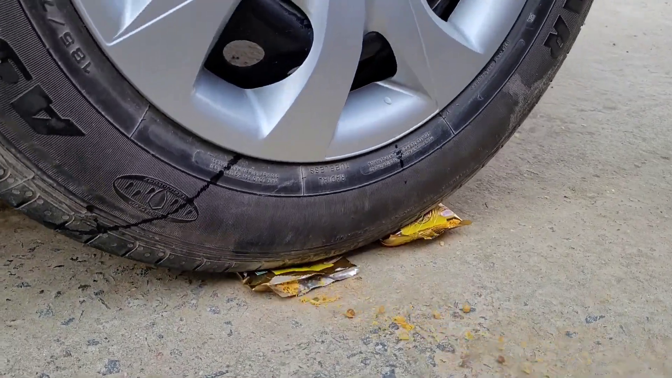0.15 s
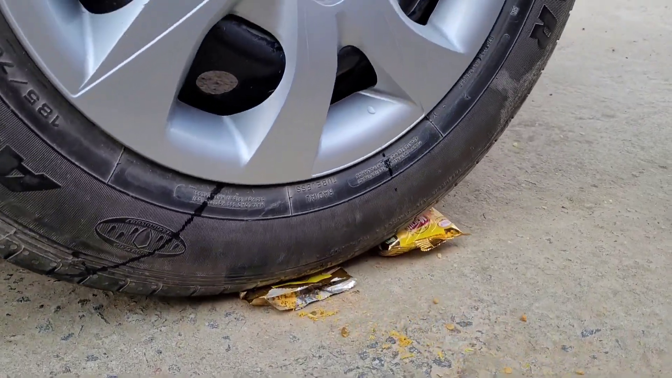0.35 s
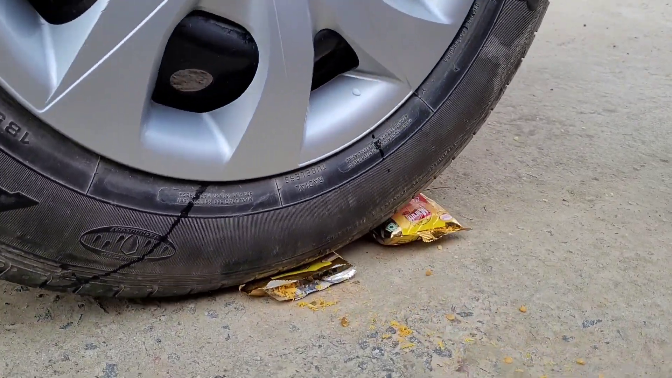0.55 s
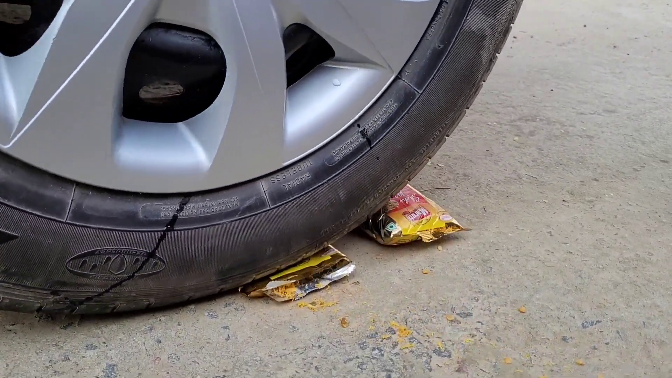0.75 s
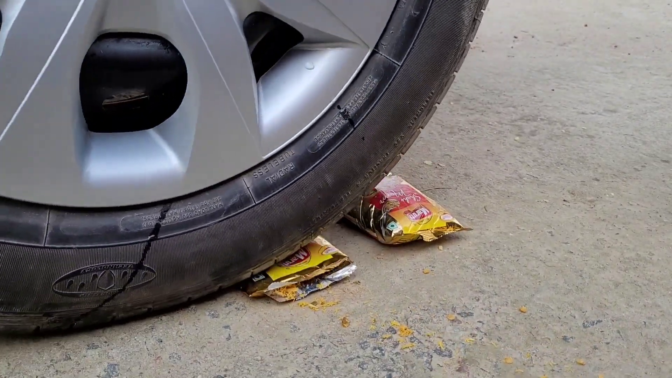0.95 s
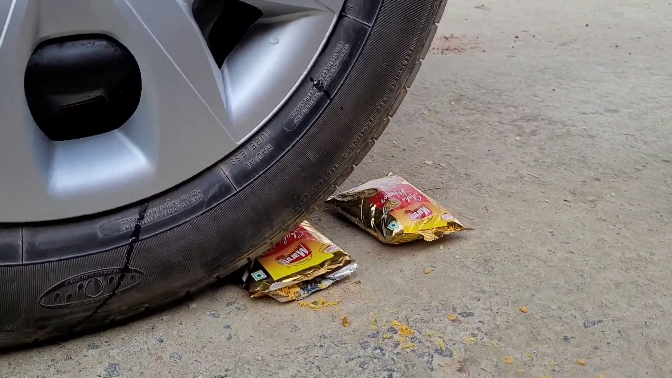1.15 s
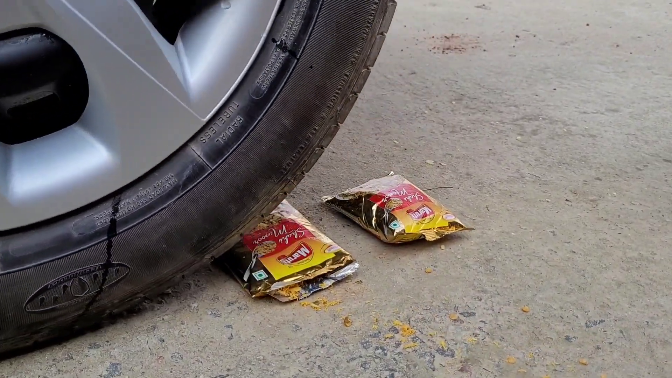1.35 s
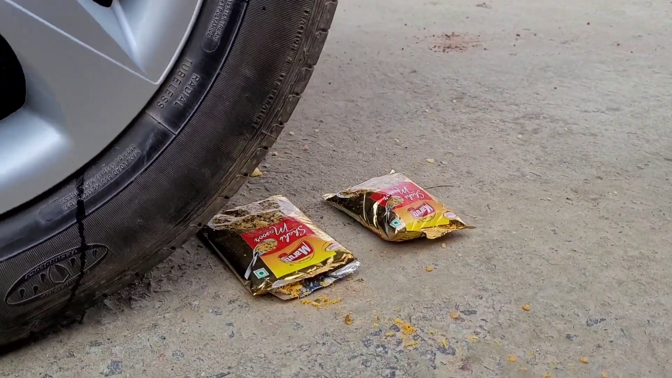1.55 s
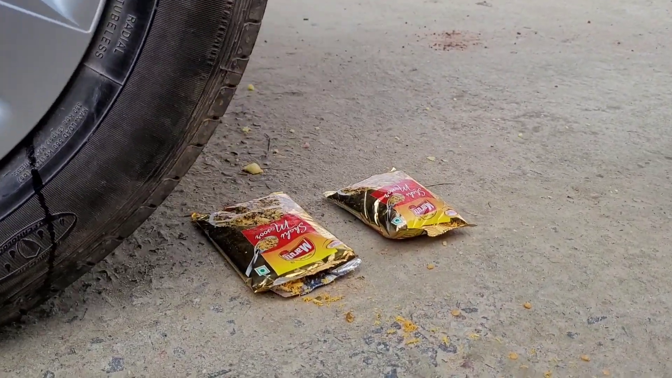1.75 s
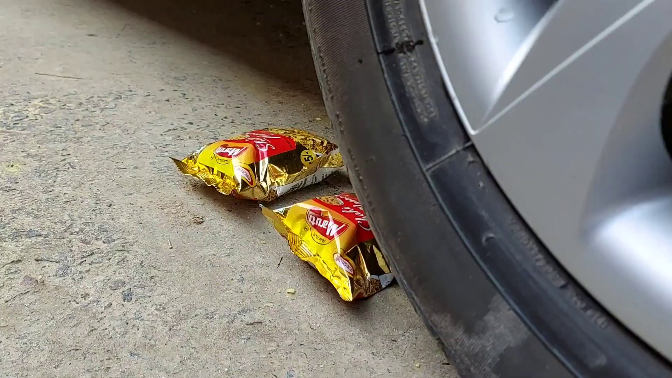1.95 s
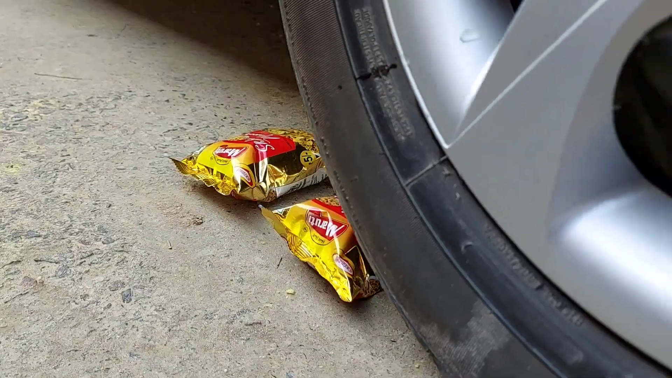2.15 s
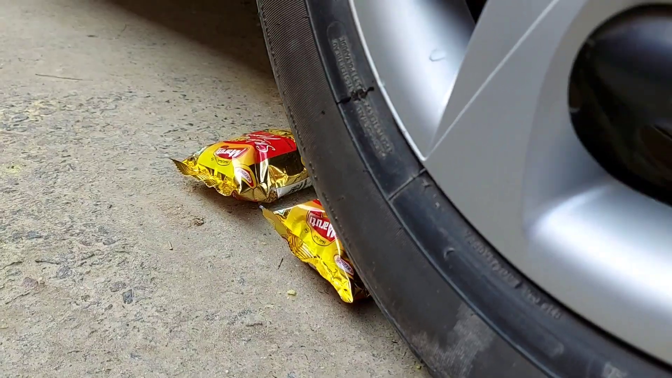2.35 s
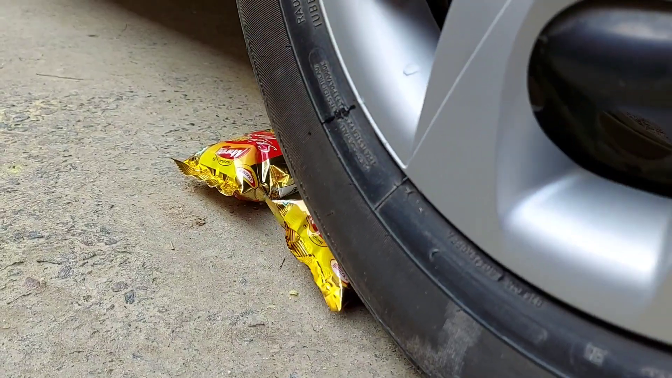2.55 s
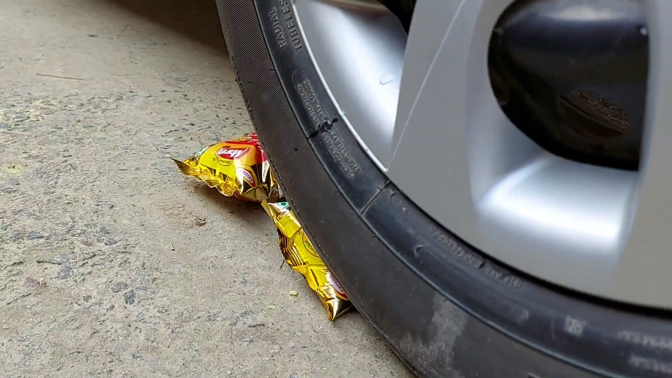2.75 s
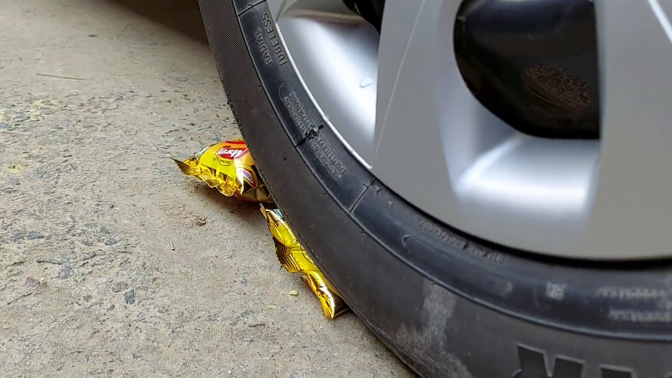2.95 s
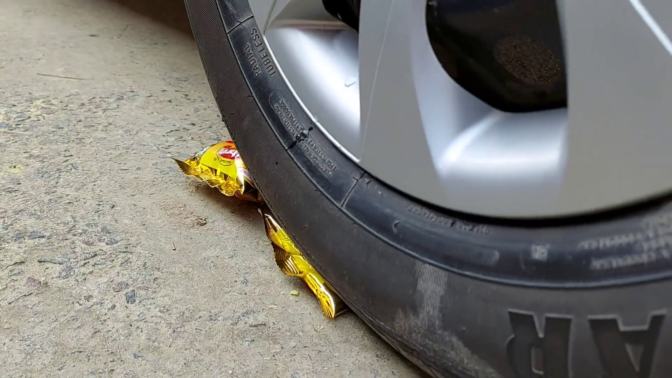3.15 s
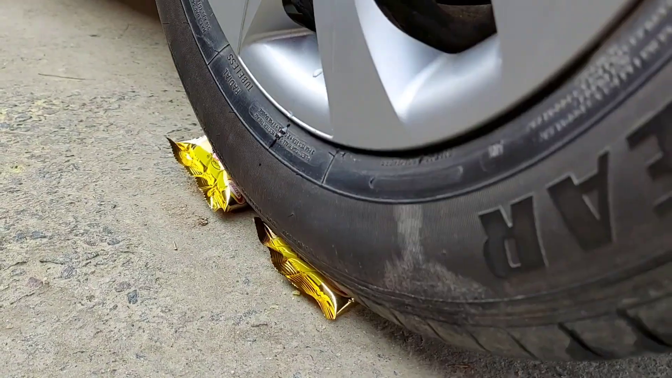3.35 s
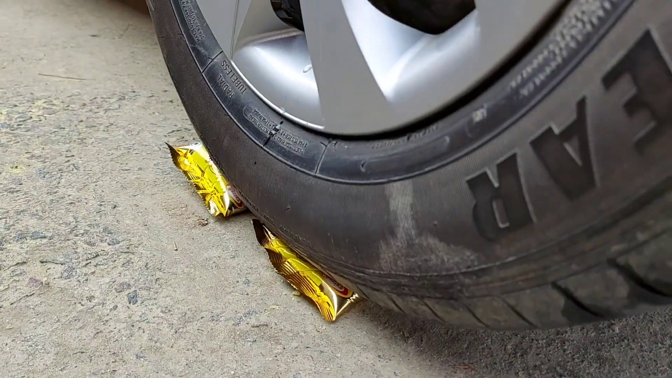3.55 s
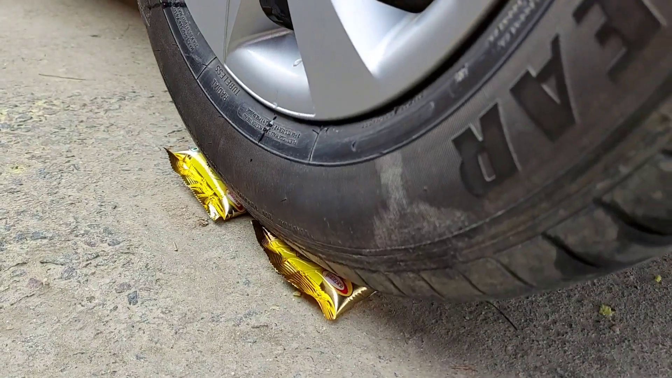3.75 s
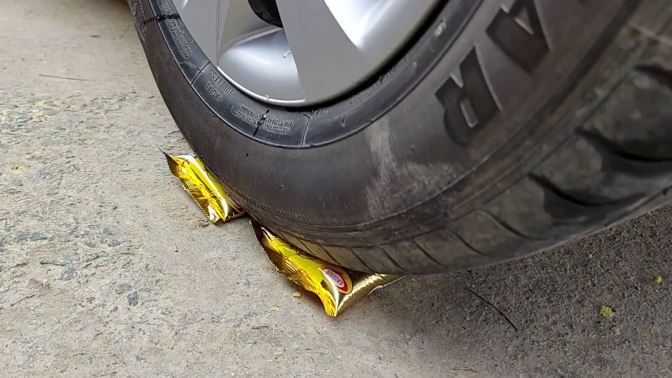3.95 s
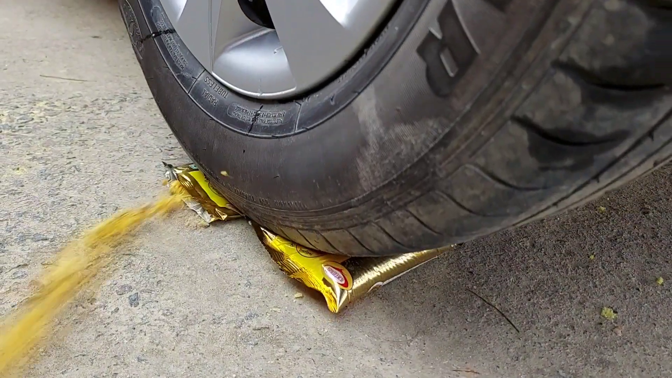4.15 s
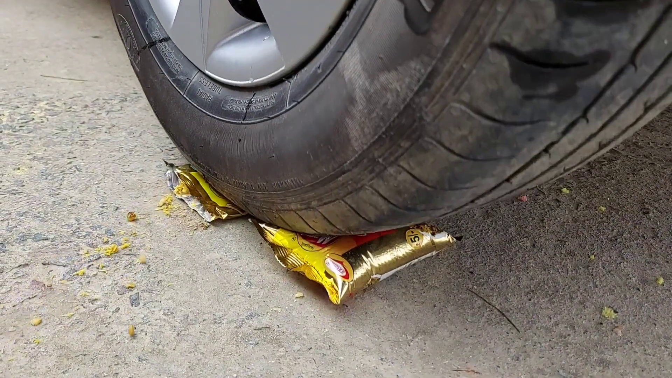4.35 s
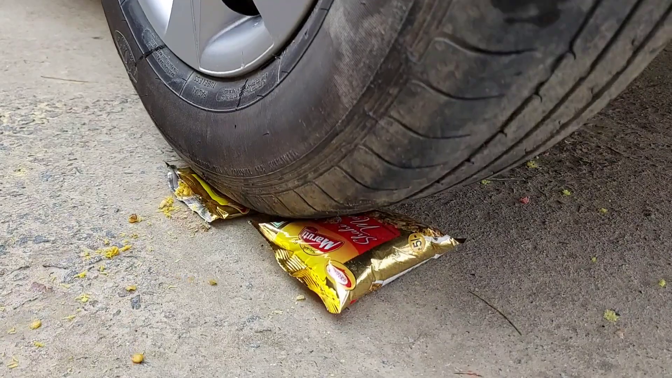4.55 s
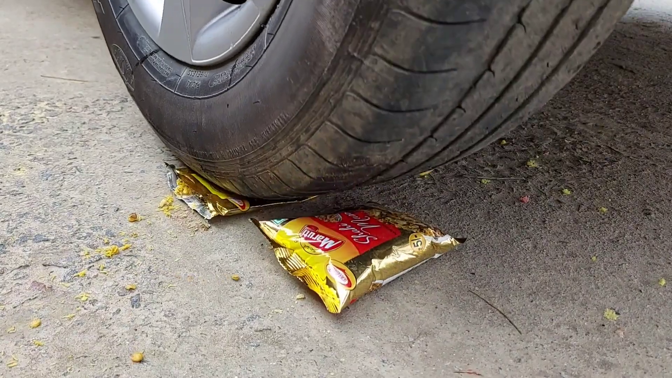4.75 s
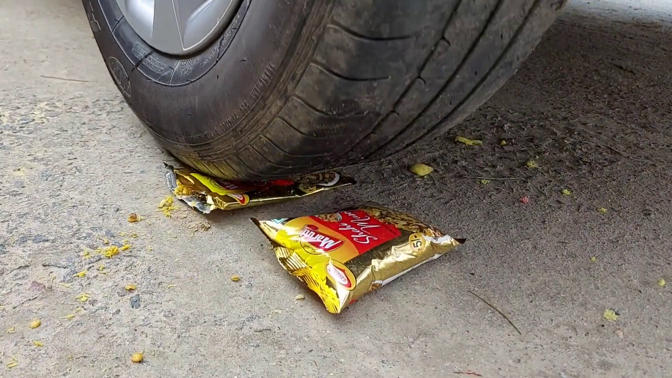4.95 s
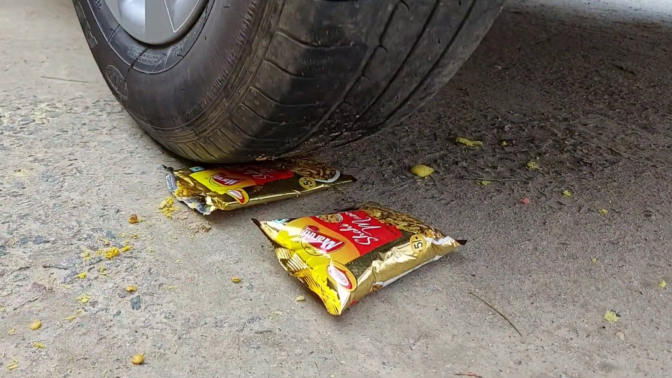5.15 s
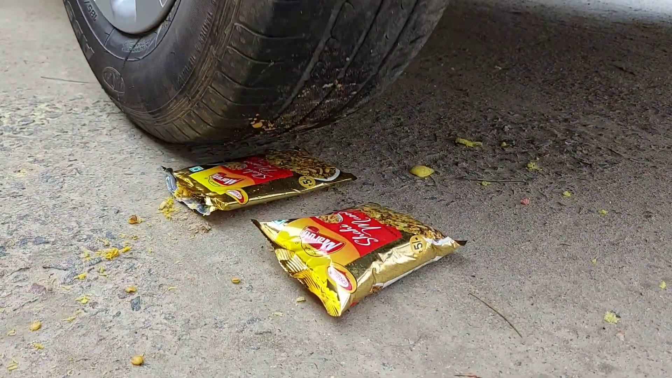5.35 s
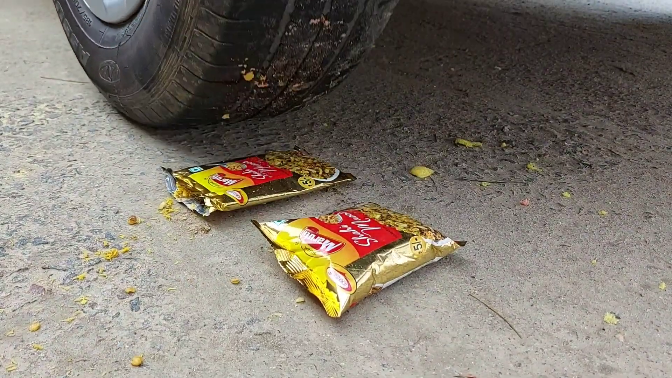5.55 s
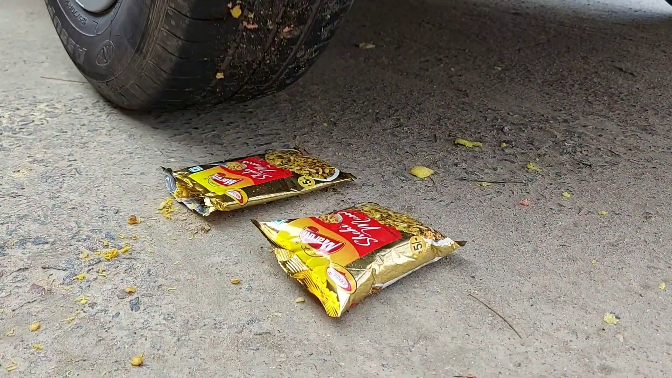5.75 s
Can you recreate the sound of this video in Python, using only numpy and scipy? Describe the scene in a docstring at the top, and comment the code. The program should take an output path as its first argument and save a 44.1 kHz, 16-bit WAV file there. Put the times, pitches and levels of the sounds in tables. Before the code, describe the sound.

Two explosive packet pops under a slow car wheel, with a dense crunch of foil and snacks between them over a low engine rumble.

```python
"""Two bangs, snapping foil and crunching snacks, over the idling engine of a car in a concrete yard.
The car creeps over sealed foil packets twice, with a short lull between the passes; one bursts in each.
A burst is a shock pulse, a rush of shaped noise, sine rings for the tyre and a diffuse wall echo.
Snaps are short damped sines with noise, crushing is showers of noise grains, the engine is sines and noise.
A microphone with two ports hears it all, each port in its own colour and with its own delay."""
import sys
import numpy as np
from scipy import signal
from scipy.fft import rfft, irfft
from scipy.io import wavfile
from scipy.ndimage import uniform_filter1d

SR = 44100
rng = np.random.default_rng(int(sys.argv[2]) if len(sys.argv) > 2 else 0)


def bounce(signal):
    """Save signal as a 16-bit WAV file at the path given by the first command-line argument."""
    frames = np.transpose(np.atleast_2d(signal))
    limited = np.clip(frames, -1, 1)
    pcm = np.round(limited * 32767).astype(np.int16)
    wavfile.write(sys.argv[1], SR, pcm)


N = 255471
TIME = np.arange(N) / SR  # [s]

# All levels are relative; spectra set a colour only and are scaled to keep the level of white noise.

# packets bursting: (time [s], bang level [dB], air rush level [dB], rush hold [s], rush decay [s],
# air push on the microphone level [dB], tyre ring level [dB])
BURSTS = [(0.0914, -13.5, -14, 0.025, 0.0067, -12.5, -44), (4.2155, 0, -23, 0.033, 0.018, -34, -41.5)]
# the air rush through each torn seam, one spectrum a burst: (frequency [Hz], level per Hz [dB])
RUSH_SPECTRA = [
    [(110, -32), (180, -9), (260, 4.5), (450, -6.5), (1000, -7), (1800, -9), (3200, -10), (5200, -15),
     (7200, -12), (8500, -29.5), (14500, -25), (16500, -29.5)],
    [(110, -3.5), (180, -10), (340, 8), (520, -1), (1350, 7), (1800, 4), (2400, 2.5), (5200, -3.5),
     (7000, -23.5), (10500, -17), (14500, -17), (16500, -29.5)],
]
# what a burst sets ringing in the tyre: (frequency [Hz], level [dB], time to fall 60 dB [s])
TYRE_RINGS = [(88, 13, 0.51), (241.7, 5, 1.27), (257.8, 16, 0.33), (321, 9, 0.058), (460, -14.5, 2)]
# dull thumps of the tread and of collapsing snacks: (time [s], level [dB], pitch [Hz])
THUMPS = [(0.81, -50.5, 189), (1.091, -47, 110), (2.167, -25.5, 172), (2.581, -26, 372),
          (2.605, -23.5, 330), (2.636, -25.5, 632), (2.652, -25, 479), (2.66, -44, 360), (5.217, -40, 92.7)]
# the clearest snaps of foil and snack: (time [s], level [dB], pitch [Hz], foil tick level [dB])
SNAPS = [(0.657, -37.5, 3430, -59.5), (0.988, -40, 3850, -77), (1.074, -37.5, 3560, -64),
         (1.276, -41.5, 3850, -69), (1.798, -20.5, 3870, -56.5), (2.524, -14.5, 1100, -43.5),
         (2.536, -13, 1104, -40), (2.581, -18.5, 1316, -53), (2.597, -6, 1360, -33.5),
         (2.606, -7.5, 2360, -33), (2.62, -3.5, 1250, -40), (2.646, -3.5, 2310, -31.5),
         (2.66, 2, 2345, -29.5), (2.691, -17, 2074, -45), (2.705, -3.5, 2314, -44.5),
         (2.724, -1, 2760, -32.5), (2.769, -8.5, 2140, -38), (2.798, -2.5, 2800, -40),
         (2.819, -15, 2370, -26.5), (2.835, -5, 4870, -33.5), (2.898, -6, 3000, -21),
         (2.956, 1, 1980, -32.5), (2.988, -14.5, 1970, -62.5), (3.044, -11.5, 4950, -36.5),
         (3.411, -19.5, 1370, -59), (3.443, -17.5, 1960, -60), (3.464, -21, 1040, -42.5),
         (3.495, -9.5, 2080, -29.5), (3.602, -25.5, 2400, -46.5), (3.706, -11.5, 4970, -23.5),
         (3.769, -18.5, 5470, -28.5), (3.836, -20.5, 4200, -35.5), (3.949, -22.5, 3300, -35),
         (3.98, -25.5, 2710, -36), (4.027, -15.5, 4830, -38), (4.059, -22, 1090, -49),
         (4.101, -25, 1200, -38), (4.14, -25, 1310, -52), (4.17, -22, 1110, -51), (4.478, -35, 1980, -54.5),
         (5.113, -37.5, 2410, -61.5), (5.197, -39, 1526, -62)]
# flurries of lesser snaps:
# (start [s], end [s], typical level [dB], typical pitch [Hz], typical foil tick level [dB])
FLURRIES = [(0.219, 0.56, -44, 3000, -61), (2.571, 2.68, -12.5, 900, -44), (3.369, 3.57, -22, 1510, -52),
            (3.651, 3.83, -22.5, 3780, -42), (4.565, 4.8, -40.5, 2000, -68.5),
            (5.218, 5.48, -49.5, 2380, -67.5)]
# packets giving way under the tread: (time [s], level [dB], time stretch of the crushing stages [ratio])
PACKETS = [(2.64, 2.5, 0.97), (3.439, -12.5, 1.4)]
# stages of crushing, in the order crumble, crunch, foil crinkle, before the stretch and level of a packet:
# (delay [s], peak level [dB], rise [dB/s], fall [dB/s], steady level under the tyre's weight [dB])
CRUSH_STAGES = [(0, -34, 95, 151, -58.5), (.075, -30.5, 132.5, 111, -51.5), (0.131, -37.5, 170.5, 81, -65)]
# the tyre's contact with the packets: (first [s], last [s])
CONTACT_S = (2.45, 4.22)
# colour of crumbling snack: (frequency [Hz], level per Hz [dB])
CRUMBLE_SPECTRUM = [(150, -10.5), (330, -1.5), (450, 3.5), (700, -9), (1100, -32.5), (2500, -56)]
# colour of crunching snack: (frequency [Hz], level per Hz [dB])
CRUNCH_SPECTRUM = [(450, -21), (850, -3), (1300, 2), (1800, -0.5), (2350, 0), (3200, -3), (4200, -3.5),
                   (5200, -2), (6200, -23.5), (9000, -40)]
# colour of foil: (frequency [Hz], level per Hz [dB])
FOIL_SPECTRUM = [(3000, -21), (5000, 3), (7300, -8.5), (8600, -6.5), (10500, 3), (12500, -4),
                 (15000, -12.5), (16500, -13.5)]
# colour of the crumpling around a snap: (frequency [Hz], level per Hz [dB])
CRUMPLE_SPECTRUM = [(200, -19), (600, -19.5), (1200, 2.5), (2400, 5.5), (3300, 1.5), (5200, 0.5),
                    (6500, -16.5), (12000, -23)]
# foil rubbing under the rubber: (start [s], end [s], level [dB], pitch [Hz])
RUBS = [(0.0, 0.085, -45, 1360), (2.438, 2.513, -44.5, 2660), (3.064, 3.46, -48, 1395)]
# flattened packets relaxing behind the tyre: (start [s], end [s], level [dB])
SETTLING = [(0.3, 1.353, -76.5), (4.408, 5.485, -66.5)]
# the car rolls away, returns, rolls away again and grows louder at the end:
# (time [s], engine level [dB], hiss level [dB])
CAR_LEVELS = [(0, -39, -48), (0.22, -60, -63), (0.7, -69.5, -75), (1.27, -66.5, -77), (1.62, -50, -63.5),
              (1.9, -47.5, -59.5), (2.14, -38, -54), (2.8, -40, -55), (3.15, -45.5, -54.5),
              (4.16, -41, -58), (4.5, -53.5, -60), (4.75, -61, -71.5), (5.5, -57, -73.5),
              (5.79, -48, -65.5)]
# engine orders: (multiple of the firing rate [ratio], level [dB])
ENGINE_ORDERS = [(2, -1.5), (3, -14.5), (4, -9.5)]
# engine rumble: (frequency [Hz], level per Hz [dB])
RUMBLE_SPECTRUM = [(15, -28.5), (28, -7), (50, -8), (90, 0.5), (125, -7.5), (180, -6), (260, -19),
                   (390, -15.5), (560, -25), (1000, -31), (2000, -54)]
# rolling hiss, one spectrum a pass: (frequency [Hz], level per Hz [dB])
HISS_SPECTRA = [
    [(300, -11), (550, 1), (1000, 1), (1350, -6.5), (2400, -1), (4200, 0), (5400, -5), (7200, 3),
     (8500, -14.5), (14500, -13.5), (16500, -21)],
    [(300, -11.5), (700, -2.5), (1000, 0.5), (1350, -7.5), (2300, -0.5), (3300, -7), (5200, -9),
     (6300, -20), (8000, -25), (10500, -18.5), (13000, -25.5), (15500, -37.5)],
]
# decay of the yard's open-air tail: (frequency [Hz], time to fall 60 dB [s])
YARD_DECAY = [(100, 0.17), (500, 0.67), (2500, 0.41), (6000, 0.25), (12000, 0.84)]
# wall echo after each burst: (first burst level [dB], second burst level [dB])
WALL_ECHO_DB = (-23, -16.5)
# balance of the two microphone ports, one curve a pass: (frequency [Hz], left minus right [dB])
PORT_BALANCE = [
    [(300, 2), (900, -2), (2000, -2.5), (5000, -2.5), (6300, -9.5), (8300, -11), (10500, 2.5), (14500, 0)],
    [(250, 3), (450, 7), (780, 20), (1050, 14), (1350, 4.5), (1800, 14.5), (2400, 18.5), (3200, -1),
     (4200, 0), (5200, -5), (6500, 4.5), (8500, 0.5), (10500, 10.5), (14500, 11.5)],
]

FIRING_HZ = 31.65  # mean firing rate of the engine
LULL_S, LULL_DB, LULL_WIDTH_S = 2.0, -21, 0.11  # centre, depth and half width of the dip between passes
FLURRY_GAP_S = 0.045  # mean time between the snaps of a flurry
STRAIN_LEAD_S = 0.007  # how long a buckle strains before it snaps
CRUMPLE_DB = -11  # crumpling around a snap, relative to that snap
EDGE_HZ = 15900  # upper band limit of the microphone


def bursts(shock_s=0.00058, tear_db=-5, tear_s=0.0051, rush_rise_s=0.00022, push_hz=58,
           dulling_hz=4000, dulling_s=0.063):
    """A shock as the seam tears, then escaping air that dulls as the pressure falls."""
    out = np.zeros((2, N))
    t = np.arange(SR // 3) / SR
    lowpass = signal.butter(1, dulling_hz, fs=SR, output="sos")
    for (s, bang_db, rush_db, hold, decay, push_db, _), spectrum in zip(BURSTS, RUSH_SPECTRA):
        air = colour(noise(len(t), 0.38), spectrum)
        shock = (1 - t / shock_s) * np.exp(-t / shock_s)
        tear = amp(tear_db) * air * np.exp(-t / tear_s)
        bang = amp(bang_db) * (shock + tear)
        flow = (1 - np.exp(-t / rush_rise_s)) * np.exp(-np.maximum(t - hold, 0) / decay)
        dull = signal.sosfilt(lowpass, air)
        rush = amp(rush_db) * flow * (dull + (air - dull) * np.exp(-t / dulling_s))
        # the gust shakes mostly the left microphone port
        push = amp(push_db) * flow * np.cos(2 * np.pi * push_hz * t) * np.array([[1.4], [0.1]])
        add(out, s, bang + rush + push)
    return out


def tyre(thump_rise_s=0.00047, thump_s=0.011):
    """Rubber and the air inside ring on after each burst; tread and collapsing snacks thump dully."""
    out = np.zeros((2, N))
    t = np.arange(SR) / SR
    ring = sum(amp(db - 60 * t / t60) * np.sin(2 * np.pi * hz * t) for hz, db, t60 in TYRE_RINGS)
    for s, *_, ring_db in BURSTS:
        add(out, s, amp(ring_db) * ring * sides(1.5))
    swell = (1 - np.exp(-t / thump_rise_s)) * np.exp(-t / thump_s)
    for s, db, hz in THUMPS:
        add(out, s, amp(db) * swell * np.sin(2 * np.pi * hz * t) * sides(0))
    return out


def snaps(spread_db=4, spread_octaves=0.45):
    """The clear snaps, and flurries of lesser ones that scatter in time, strength and pitch."""
    out = np.zeros((2, N))
    for s, *buckle in SNAPS:
        add(out, s - STRAIN_LEAD_S, snap(*buckle))
    for start, end, db, hz, foil_db in FLURRIES:
        for s in np.arange(start, end, FLURRY_GAP_S):
            late, size, pitch, shine = rng.uniform(-1, 1, 4)
            lesser = snap(db + spread_db * size, hz * 2 ** (spread_octaves * pitch),
                          foil_db + spread_db * shine)
            add(out, s + late * FLURRY_GAP_S / 2, lesser)
    return out


def snap(db, hz, foil_db, cycles=1.76, ring_db=-2, crumple_s=0.0015, rise_s=0.00078,
         tick_db=10, tick_s=0.00037, strain_db=-12, strain_s=0.0016):
    """A buckle strains briefly, rings for a few cycles, crumples its surroundings and ticks brightly."""
    t = np.arange(-STRAIN_LEAD_S, 1 / 25, 1 / SR)  # zero is the moment of the snap
    age = np.maximum(t, 0)
    strain = amp(strain_db) * np.exp(-abs(t) / strain_s)
    ring_envelope = np.exp(-age * hz / cycles) * (1 - np.exp(-2 * age * hz))
    ring = amp(ring_db) * np.sin(2 * np.pi * hz * age) * ring_envelope
    folding = strain + np.exp(-age / crumple_s) * (1 - np.exp(-age / rise_s))
    crumple = amp(CRUMPLE_DB) * colour(noise(len(t), 0.057), CRUMPLE_SPECTRUM) * folding
    tick_envelope = strain + (t >= 0) * np.exp(-age / tick_s)
    tick = amp(foil_db + tick_db) * colour(noise(len(t), 0.097) * tick_envelope, FOIL_SPECTRUM)
    return amp(db) * (ring + crumple) + tick


def crushing():
    """The snacks crumble and crunch while the foil crinkles around them."""
    crumble = grains(CRUMBLE_SPECTRUM, per_s=510, spread_db=6.0)
    crunch = grains(CRUNCH_SPECTRUM, per_s=490, spread_db=5.0)
    crinkle = grains(FOIL_SPECTRUM, per_s=230, spread_db=6.0)
    return sum(stage(*row) * sound for row, sound in zip(CRUSH_STAGES, (crumble, crunch, crinkle)))


def stage(delay, peak_db, rise, fall, steady_db, ease_s=0.03):
    """Gain of one stage of crushing: it swells and dies for each packet, over a steady grinding."""
    first, last = CONTACT_S
    contact = np.clip(np.minimum(TIME - first, last - TIME) / ease_s, 0, 1)
    power = (amp(steady_db) * contact) ** 2
    for s, db, stretch in PACKETS:
        t = (TIME - s) / stretch - delay
        power = power + amp(db + peak_db + np.minimum(rise * t, -fall * t)) ** 2
    return np.sqrt(power)


def grains(spectrum, per_s, spread_db, grain_s=0.00092):
    """Random tiny fractures of unequal size, each a puff of noise about a millisecond long."""
    struck = rng.exponential(1, N)
    size = amp(spread_db * np.minimum(struck, 3)) * (rng.random(N) < per_s / SR)
    # overlapping puffs add as power
    power = signal.lfilter([1], [1, -np.exp(-2 / grain_s / SR)], size ** 2)
    return unit(colour(np.sqrt(power) * noise(N, 0.18), spectrum))


def rubbing(slips_per_s=220):
    """Foil sticks and slips against the tread, creaking in one broad resonance."""
    out = np.zeros((2, N))
    for start, end, db, hz in RUBS:
        resonance = [(hz / 2, -30), (hz / 1.3, -10), (hz, 0), (hz * 1.2, -10), (hz * 2, -30)]
        size = max(round((end - start) * SR), 1)
        slips = grains(resonance, per_s=slips_per_s, spread_db=5.5)[:, :size]
        add(out, start, amp(db) * unit(slips) * signal.windows.tukey(slips.shape[1], 0.4))
    return out


def settling():
    """Released foil unfolds in sparse small ticks, dull and bright."""
    out = np.zeros((2, N))
    dull = grains(CRUNCH_SPECTRUM, per_s=40, spread_db=2.0, grain_s=0.0014)
    bright = grains(FOIL_SPECTRUM, per_s=22.0, spread_db=3.0)
    ticks = dull + amp(-13.5) * bright
    for start, end, db in SETTLING:
        part = ticks[:, round(max(start, 0) * SR):round(end * SR)]
        add(out, start, amp(db) * unit(part) * signal.windows.tukey(part.shape[1], 0.2))
    return out


def car(waver=0.0081):
    """Wavering engine orders in a rumble, with hiss and fine grit under the tread."""
    smooth = uniform_filter1d(rng.standard_normal(N), size=6000)
    drift = unit(uniform_filter1d(smooth, size=6000))
    turns = np.cumsum(FIRING_HZ * (1 + waver * drift)) / SR  # firing cycles so far
    hum = sum(amp(db) * np.sqrt(2) * np.sin(2 * np.pi * (round(k) * turns + rng.random()))
              for k, db in ENGINE_ORDERS)
    rumble = amp(0.5) * colour(noise(N, 0.81), RUMBLE_SPECTRUM)
    engine = amp(-0.5) * level(CAR_LEVELS, axis=1) * (hum + rumble) * sides(-3.5)
    first, second = (colour(noise(N, 0.11), spectrum) for spectrum in HISS_SPECTRA)
    hiss = np.where(TIME < LULL_S, amp(7.5) * first, amp(6.5) * second)
    coarse_grit = amp(-4) * grains(CRUMPLE_SPECTRUM, per_s=62, spread_db=4.5)
    bright_grit = amp(-16.5) * grains(FOIL_SPECTRUM, per_s=30, spread_db=4.5)
    rolling = level(CAR_LEVELS, axis=2) * (hiss + coarse_grit + bright_grit)
    lull = amp(LULL_DB * np.maximum(1 - abs(TIME - LULL_S) / LULL_WIDTH_S, 0))
    return lull * (engine + rolling)


def yard(x, near_db=-4, far_db=-19, wall_db=-21, wall_s=0.077):
    """Quick reflections between ground and car body, an echo off a wall, and a faint open-air tail."""
    near = tail([(200, 0.094), (2000, 0.058), (6000, 0.07), (12000, 0.051)], rise_s=0.0018)
    far = colour(tail(YARD_DECAY, rise_s=0.0084), [(100, -0.5), (700, 2.5), (5000, 1.5), (12000, -3.5)])
    wall = colour(tail([(200, 0.06), (8000, 0.4)], rise_s=0.016),
                  [(100, -15.5), (700, 1.5), (6000, -6.0), (12000, -5)])
    taps = amp(near_db) * near + amp(far_db) * far
    add(taps, wall_s, amp(wall_db) * wall)  # the delay is some 26 m of extra path
    return x + signal.fftconvolve(x, taps, axes=1)[:, :N]


def tail(t60s, rise_s):
    """Diffuse reflections of energy 1; each band dies at its own speed."""
    hz, t, z = signal.stft(noise(SR, 0.55), SR, nperseg=128)
    fading = z * amp(-60 * t / read(t60s, hz)[:, None])
    taps = signal.istft(fading, SR, nperseg=128)[1][:, :SR]
    rise = 1 - np.exp(-np.arange(SR) / SR / rise_s)
    return unit(taps * rise) / np.sqrt(SR)


def ports(x, depth, lag_s=0.00008):
    """The two microphone ports differ in colour and arrival time; the tyre changes side between passes."""
    hz = np.fft.rfftfreq(N, 1 / SR)
    half = np.array([[1], [-1]]) / 2
    passes = []
    for balance, lag in zip(PORT_BALANCE, (-lag_s, lag_s)):
        gains = amp(half * depth * read(balance, hz))
        gains = gains / np.sqrt(np.mean(gains ** 2, axis=0))  # keeps the power of both ports together
        delay = np.exp(-2j * np.pi * hz * lag * half)
        passes.append(irfft(rfft(x) * gains * delay, N))
    return np.where(TIME < LULL_S, *passes)


def amp(db):
    """Decibels to gain."""
    return 10 ** (np.asarray(db) / 20)


def unit(x):
    """Scales to rms 1."""
    return x / np.sqrt(np.mean(x ** 2) + 1e-20)


def read(points, hz):
    """Reads a table on a log-frequency axis."""
    f, value = np.transpose(points)
    return np.interp(np.log(hz + 1), np.log(f + 1), value)


def level(table, axis):
    """Gain over time from one dB column of a curve."""
    rows = np.array(table)
    return amp(np.interp(TIME, rows[:, 0], rows[:, axis]))


def sides(pan_db):
    """Left and right gains whose mean is 1; pan_db is left minus right."""
    gains = amp(np.array([[pan_db], [-pan_db]]) / 2)
    return gains / gains.mean()


def add(mix, s, sound):
    """Mixes a stereo sound in at s seconds."""
    part = mix[:, max(round(s * SR), 0):][:, :sound.shape[1]]
    part += sound[:, :part.shape[1]]


def colour(x, spectrum, size=4096):
    """Causal filter with the given spectrum; white noise keeps its level."""
    hz = abs(np.fft.fftfreq(size, 1 / SR))
    log_gain = np.log(unit(amp(read(spectrum, hz))) + 1e-5)
    # the Hilbert transform supplies the minimum phase
    taps = np.fft.ifft(np.exp(np.conj(signal.hilbert(log_gain)))).real
    return signal.oaconvolve(x, taps[None], axes=1)[:, :x.shape[1]]


def noise(size, alike):
    """White noise in two channels that are partly alike (0 = independent, 1 = identical)."""
    shared, own = rng.standard_normal(size), rng.standard_normal((2, size))
    alike = np.clip(alike, 0, 1)
    return np.sqrt(alike) * shared + np.sqrt(1 - alike) * own


def scene():
    """The bursts differ less between the ports, as their loud sound overloads the left one."""
    packets = snaps() + crushing() + rubbing() + settling()
    rolling = yard(packets) + car()
    bangs = amp(-2.0) * bursts()
    first = TIME < LULL_S
    first_bang = yard(bangs * first, wall_db=WALL_ECHO_DB[0])
    second_bang = yard(bangs * ~first, wall_db=WALL_ECHO_DB[1])
    return ports(rolling, depth=0.95) + ports(first_bang + second_bang, depth=0.3) + tyre()


def record(dry):
    """The loudest peaks overload the microphone; then the band limit."""
    overloaded = np.clip(dry, -1, 1)
    lowpass = signal.firwin(255, EDGE_HZ, window=("kaiser", 8), fs=SR)
    return signal.oaconvolve(overloaded, lowpass[None], "same")


dry = scene()
out = record(dry)
bounce(out)
```